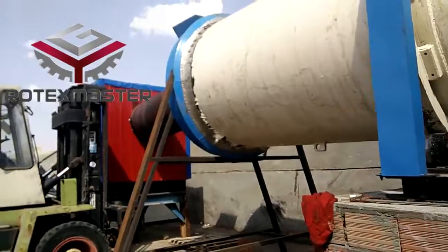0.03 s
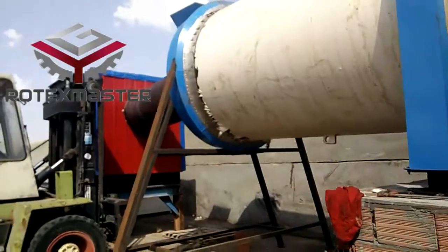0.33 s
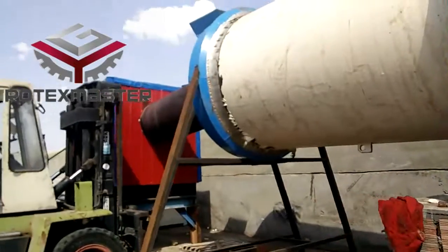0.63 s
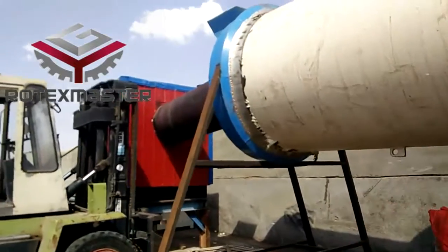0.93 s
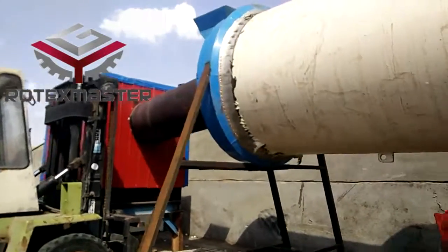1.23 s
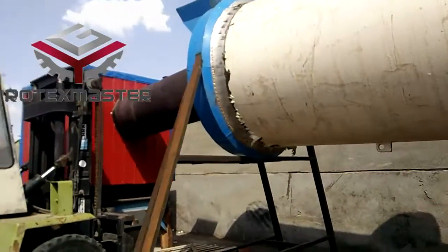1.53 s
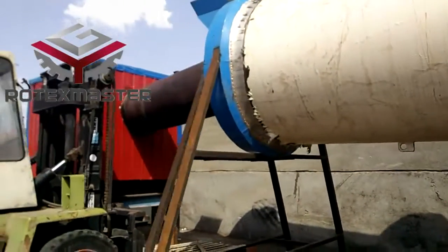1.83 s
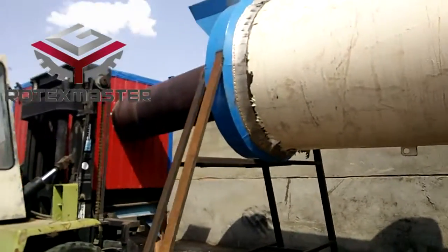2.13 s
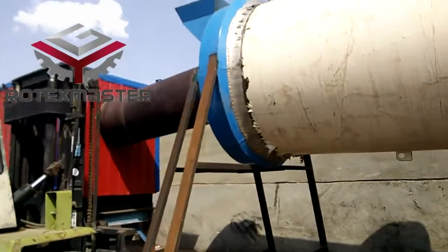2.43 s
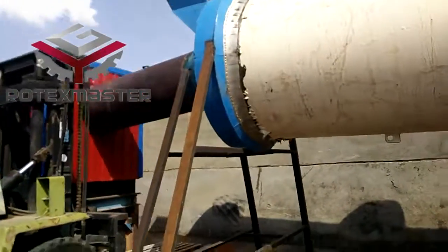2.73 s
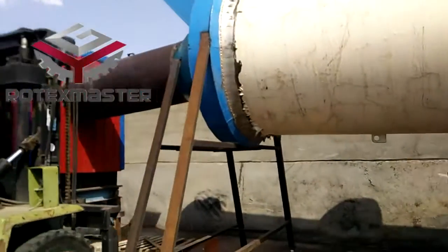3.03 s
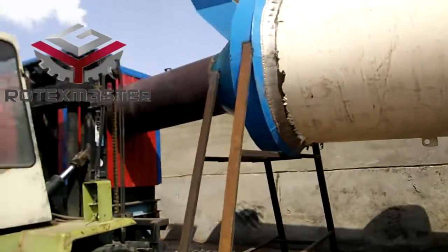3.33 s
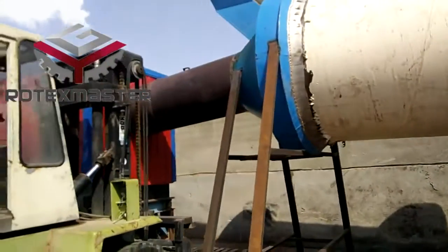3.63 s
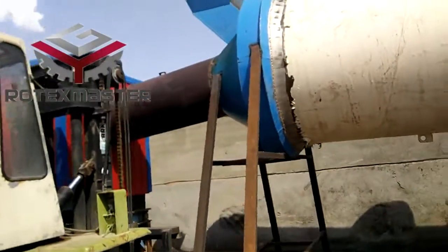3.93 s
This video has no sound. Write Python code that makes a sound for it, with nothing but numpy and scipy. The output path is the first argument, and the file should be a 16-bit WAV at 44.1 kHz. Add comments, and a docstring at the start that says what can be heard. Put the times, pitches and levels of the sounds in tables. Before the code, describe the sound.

Steady roar and pulsing whine of an industrial drum dryer, with one short puff of air.

```python
"""A steady roar with a throbbing whine above it: a large rotary drum dryer runs outdoors.
Turbulence in burner and blower makes the roar, over a few low hums. The drive gears mesh at
multiples of their shaft rate, and the varying load modulates the amplitude of their tones.
At about 2.5 s a short puff of air hits the microphone: a hiss at its port, then low buffeting
from the pressure of the eddies."""
import sys
import numpy as np
from scipy import signal
from scipy.io import wavfile

SR = 44100
rng = np.random.default_rng(int(sys.argv[2]) if len(sys.argv) > 2 else 0)


def unload_wav(signal):
    """Save mono or channel-first audio to the path in sys.argv[1] as 16-bit WAV at rate SR, clipped to [-1, 1]."""
    wavfile.write(
        sys.argv[1],
        SR,
        np.round(np.clip(np.atleast_2d(signal).T, -1, 1) * 32767).astype(np.int16),
    )


N = 176400
T = np.arange(N) / SR


def from_db(db):
    """Amplitude ratio of a level in decibels."""
    return 10 ** (np.asarray(db) / 20)


def unit_rms(x):
    """Normalisation to an rms of 1."""
    return x / np.sqrt(np.mean(x ** 2) + 1e-20)


def in_time(rows):
    """Linear interpolation of (time [s], value) rows."""
    return np.interp(T, *np.transpose(rows))


def drift(rate_hz):
    """Random modulation: low-passed noise with an rms near 1."""
    step = 40  # samples between computed points
    pole = np.exp(-2 * np.pi * rate_hz * step / SR)
    white = rng.standard_normal(N // step + 2002)
    slow = signal.lfilter([1], [1, -2 * pole, pole * pole], white)[2000:]
    return np.interp(np.arange(N) / step, np.arange(len(slow)), unit_rms(slow))


def phase_of(hz):
    """Phase as the time integral of frequency, from a random start."""
    return 2 * np.pi * (np.cumsum(hz) / SR + rng.random())


def filtered(x, order, hz, kind="low"):
    """Filtering with a maximally flat passband."""
    return signal.sosfilt(signal.butter(order, hz, kind, fs=SR, output="sos"), x)


def resonate(x, hz, width_hz):
    """A damped resonator with unit gain at its peak."""
    r = np.exp(-np.pi * width_hz / SR)
    feedback = [1, -2 * r * np.cos(2 * np.pi * hz / SR), r * r]
    return signal.lfilter(np.array([1, 0, -1]) * (1 - r * r) / 2, feedback, x)


def ringing_noise(hz, width_hz):
    """Random excitation of two equal resonators in series; rms 1."""
    once = resonate(rng.standard_normal(N), hz, width_hz)
    return unit_rms(resonate(once, hz, width_hz))


def banded_noise(spectrum, flicker_db):
    """Broadband noise as a sum of independently modulated quarter-octave bands; rms 1."""
    edges = 20 * 2 ** np.arange(0, 9.6, .25)
    hz, db = np.transpose(spectrum)
    out, white = 0, rng.standard_normal((2, N + SR // 2))
    for k, (low, high) in enumerate(zip(edges, edges[1:])):
        band = filtered(white[k % 2], 3, [low, high], "band")[-N:]
        centre_db = np.interp(np.log(low * high) / 2, np.log(hz), db)
        out += band * from_db(centre_db + flicker_db * drift(11.4))
    return unit_rms(out)


# envelope of the roar: (time [s], level [dB])
ROAR_LEVEL = [(0, -29), (1.1, -29), (1.8, -29.5), (2.25, -29.5), (3.0, -30), (4.0, -30)]
# spectrum of the roar: (frequency [Hz], relative spectral density [dB])
ROAR_SPECTRUM = [(20, -19.5), (35, -11), (55, -5), (80, -7), (110, -3), (135, 1.4), (165, 2), (200, -2),
                 (250, 0.5), (340, -0.34), (450, -5), (680, -6), (950, -9), (1250, -13), (1550, -9.5),
                 (2000, -9), (2800, -13.5), (3400, -19.5), (4200, -22.5), (5400, -37.5), (6800, -51),
                 (9000, -68), (14000, -75)]

def roar():
    """Turbulence in the flame and in the air rushing through the drum radiates broadband noise."""
    return from_db(in_time(ROAR_LEVEL)) * banded_noise(ROAR_SPECTRUM, flicker_db=1)


# envelope of the deepest hum: (time [s], level [dB])
DRONE_LEVEL = [(0, -45), (.27, -50), (.42, -40.5), (.75, -42), (1.0, -47.5), (2.4, -46.5), (3.2, -50),
               (4, -54)]
# the other hums: (frequency [Hz], base level [dB])
HUMS = [(84, -50.5), (168, -45.5), (337, -41.5), (631, -51), (676, -53)]
# they fade as the microphone moves on: (time [s], gain [dB])
HUM_GAIN = [(0, 2), (2.3, 3), (3.1, -2.5), (4, -3)]

def hums(drone_hz=41.5):
    """Nearly periodic vibration of burner and blower radiates low, wavering tones."""
    out = from_db(in_time(DRONE_LEVEL) + .6 * drift(4)) * np.sin(phase_of(drone_hz + .8 * drift(3)))
    for hz, db in HUMS:
        amplitude = from_db(db + in_time(HUM_GAIN) + drift(3.5))
        out += amplitude * np.sin(phase_of(hz + 1.203 * drift(3.83)))
    return np.sqrt(2) * out  # rms to peak amplitude


def gear_tone(mesh_phase, scatter, beat_phase=0, beat_depth=0):
    """Uneven tooth contact broadens a spectral line; a weaker neighbour, if any, makes beats; rms 1."""
    phase = mesh_phase + 2 * np.pi * rng.random()
    sidebands = scatter * (drift(8.1) * np.sin(phase) + drift(11) * np.cos(phase))
    neighbour = beat_depth * np.sin(phase + beat_phase)
    return unit_rms(np.sin(phase) - neighbour + sidebands)


# three leading whines that swell and break off, each: (time [s], level [dB])
MAIN_WHINE = [(0, -46), (.12, -50), (.2, -38), (.33, -50), (.46, -40), (.6, -46), (.71, -50), (.78, -41),
              (.97, -33.5), (1.07, -39.5), (1.2, -35), (1.28, -40), (1.34, -35.5), (1.4, -32.5),
              (1.44, -48), (1.48, -32), (1.53, -36), (1.57, -42), (1.61, -33), (1.66, -37.5), (1.7, -46),
              (1.75, -35), (1.84, -35), (1.93, -46), (1.98, -49), (2.09, -38), (2.18, -58), (2.24, -43),
              (2.31, -54), (2.38, -39.5), (2.53, -37), (2.63, -49), (2.72, -34), (2.79, -51), (2.84, -37),
              (3.0, -37), (3.08, -46), (3.23, -44), (3.3, -47), (3.36, -34), (3.45, -47), (3.53, -34),
              (3.6, -52), (3.66, -39), (4, -43)]
LOWER_WHINE = [(0, -53.5), (.5, -50.5), (1.1, -52.5), (2.25, -46.5), (2.41, -43), (2.65, -51), (3.02, -41),
               (3.25, -54.5), (3.38, -40.5), (3.57, -47.5), (3.65, -39.5), (4, -43.5)]
MIDDLE_WHINE = [(0, -46), (.35, -52), (.69, -38.5), (.79, -51), (.88, -35.5), (1.0, -53), (1.75, -54),
                (1.88, -40.5), (2.0, -49), (2.7, -48.5), (2.95, -39), (3.1, -51.5), (3.3, -36), (3.38, -43),
                (3.47, -38), (3.65, -44.5), (4, -49)]
# two high, pulsing whines, each: (time [s], level [dB])
UPPER_WHINE = [(0, -48), (.68, -48.5), (.78, -43.5), (1.03, -41.5), (1.35, -48.5), (1.55, -43), (2.05, -49),
               (2.4, -44), (2.65, -50.5), (2.87, -46.5), (3.2, -45), (3.42, -51), (3.58, -45.5), (3.7, -53),
               (3.85, -44), (4, -45.5)]
TOP_WHINE = [(0, -58), (.35, -44.5), (.64, -52), (.85, -49), (1.32, -47.5), (1.58, -47), (1.85, -61),
             (2.15, -55), (2.36, -44), (2.56, -55), (2.86, -47), (3.05, -55), (3.25, -49), (4, -60)]
# a cluster of weaker gear tones: (order [multiple of the shaft rate])
CLUSTER_ORDERS = [45, 46, 48, 52, 54, 56, 57, 60, 61, 64, 66, 68, 71, 73, 74, 75, 90]
# strength of each of those tones: (level [dB])
CLUSTER_LEVELS = [-48.5, -49, -48, -51.5, -49.5, -52, -54.5, -53.5, -49.5, -49, -47.5, -51.5, -55, -56.5,
                  -55, -54, -66]

def gears(shaft_hz=33.124, pulse_hz=10.9, crest_s=1.02, throb_hz=10.5):
    """Meshing teeth radiate harmonics of the shaft rate, modulated in amplitude as the load varies."""
    shaft = phase_of(shaft_hz * (1 + .000514 * drift(2.82)))
    pulse = np.pi + 2 * np.pi * pulse_hz * (T - crest_s)
    out = 0
    for order, level in (55, MAIN_WHINE), (44, LOWER_WHINE), (53, MIDDLE_WHINE):
        out += from_db(in_time(level)) * gear_tone(order * shaft, scatter=.08)
    for order, level in (83, UPPER_WHINE), (92, TOP_WHINE):
        tone = gear_tone(order * shaft, scatter=.08, beat_phase=pulse, beat_depth=.55)
        out += from_db(in_time(level)) * tone
    for order, db in zip(CLUSTER_ORDERS, CLUSTER_LEVELS):
        amplitude = from_db(db + .1 * drift(1.7))
        throb = phase_of(throb_hz + 1.2 * drift(2.8))
        out += amplitude * gear_tone(order * shaft, scatter=.42, beat_phase=throb, beat_depth=.42)
    return out


# spectrum of the hiss: (frequency [Hz], relative spectral density [dB])
HISS_SPECTRUM = [(500, 2), (750, -3), (1250, 1.5), (2200, -4), (3000, -5.5), (3900, -4.5), (4800, -14),
                 (5500, -17.5), (6000, -18), (6400, -30.5), (7000, -18), (8200, -41), (11000, -43),
                 (14000, -60)]
# resonances of the microphone port: (frequency [Hz], bandwidth [Hz], level re the hiss [dB])
PORT_RESONANCES = [(3283, 210, -4.5), (4570, 380, -10.5), (5060, 370, -16)]
# envelope of the hiss, following the air speed: (time [s], gain [dB])
HISS_GAIN = [(2.52, -76), (2.543, -40), (2.577, -28), (2.592, -31), (2.652, -32.5), (2.663, -30),
             (2.672, -32), (2.722, -34), (2.745, -43), (2.80, -78)]

def hiss(dull_hz=5400, dulling_s=(2.6, 2.73)):
    """Flow noise excites the resonances of the microphone port and loses treble as the air slows."""
    out = banded_noise(HISS_SPECTRUM, flicker_db=1.5)
    for hz, width_hz, db in PORT_RESONANCES:
        out += from_db(db) * ringing_noise(hz, width_hz)
    dull = signal.sosfiltfilt(signal.butter(2, dull_hz, fs=SR, output="sos"), out)
    out += np.interp(T, dulling_s, [0, 1]) * (dull - out)
    blowing = (T > HISS_GAIN[0][0]) & (T < HISS_GAIN[-1][0])
    flutter_db = 1.5 * drift(49)
    return blowing * from_db(in_time(HISS_GAIN) + flutter_db) * out


# rasps in the puff: (time [s], level at the crest [dB], half-width [s], centre [Hz], bandwidth [Hz])
RASPS = [(2.559, -47, .006, 5130, 400), (2.577, -36, 0.0032, 4800, 1200), (2.664, -27, 0.0023, 1700, 1380),
         (2.68, -28, 0.0026, 3350, 500), (2.72, -33, 0.0029, 1790, 1570)]

def rasps():
    """Edge noise: the air stream catches the rim of the port in short, band-limited bursts."""
    out = 0
    for time, db, half_width, hz, width_hz in RASPS:
        band = filtered(rng.standard_normal(N), 4, [hz - width_hz / 2, hz + width_hz / 2], "band")
        burst = np.exp(-((T - time) / half_width) ** 2 / 2)
        out += from_db(db) * burst * unit_rms(band)
    return out


def eddy_pressure(eddies_per_s=125):
    """Turbulent pressure as irregular impulses plus noise, confined to low frequencies; rms 1."""
    gaps, sizes = rng.standard_normal((2, 800))
    arrivals = (np.cumsum(np.exp(.32 * gaps)) / eddies_per_s * SR).astype(int)
    kicks = np.bincount(arrivals, from_db(2.5 * sizes), N)[:N]
    churn = resonate(.8 * rng.standard_normal(N) - unit_rms(kicks), hz=182, width_hz=200)
    return unit_rms(filtered(churn, order=2, hz=647))


# the hardest eddies: (time [s], peak level before the low cut [dB], half-width [s])
HARD_EDDIES = [(2.581, -11, .0011), (2.590, -13, 0.00063), (2.599, -19, .0010), (2.607, -12, 0.0009),
               (2.630, -15, 0.00075), (2.642, -8.5, 0.00035), (2.667, -11.5, 0.0011), (2.679, -16, 0.00087),
               (2.688, -11, 0.00069), (2.705, -11.5, 0.0011), (2.716, -16, 0.00065), (2.728, -18.5, 0.0015),
               (2.742, -14.5, .0012), (2.775, -22, 0.0011)]

def buffeting(start_s=2.578, attack_s=.003, hold_s=.149, release_s=.04):
    """Eddies load the microphone with fluctuating pressure; each hard one is a push, then suction."""
    corners = start_s + np.cumsum([0, attack_s, hold_s, release_s])
    gust = from_db(-21) * np.interp(T, corners, [0, 1, 1, 0])
    out = gust * eddy_pressure()
    for time, db, half_width in HARD_EDDIES:
        passage = (T - time) / half_width
        out -= from_db(db) * passage * np.exp((1 - passage ** 2) / 2)
    return filtered(out, order=2, hz=58, kind="high")


def rattle(casing_hz=530, decay_s=.0037, gain_db=-8.5):
    """Shock excitation: each hard eddy starts decaying noise in a resonance of the microphone casing."""
    jolts = sum(from_db(db + gain_db) * (T > time) * np.exp(-np.abs(T - time) / decay_s)
                for time, db, _ in HARD_EDDIES)
    envelope = filtered(jolts, order=4, hz=casing_hz)
    return envelope * ringing_noise(casing_hz, width_hz=310)


def scene():
    """Superposition of the running dryer and the puff of air, in mono."""
    dryer = roar() + hums() + gears()
    puff = hiss() + rasps() + buffeting() + rattle()
    return (dryer + puff)[None]


def record(dry):
    """Band limiting: a steep low-pass filter removes the treble above 15.7 kHz."""
    return signal.sosfilt(signal.cheby2(12, 70, 15700, fs=SR, output="sos"), dry)


dry = scene()
out = record(dry)
unload_wav(out)
```